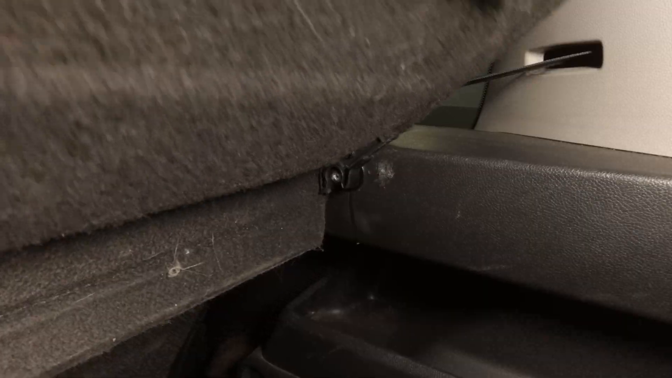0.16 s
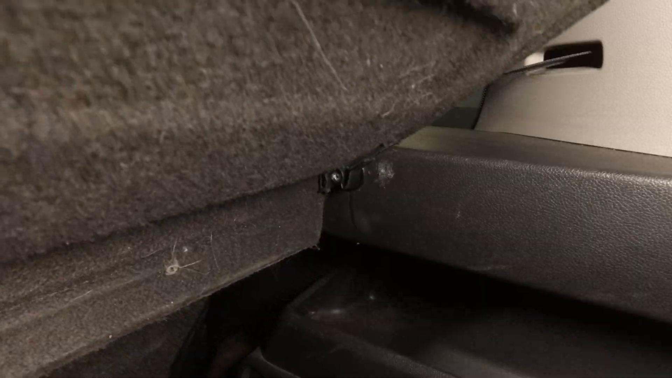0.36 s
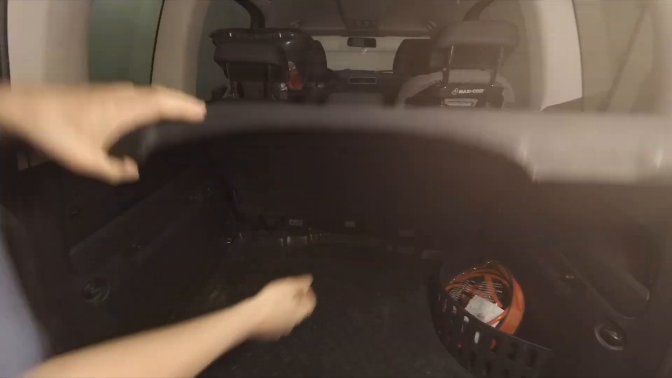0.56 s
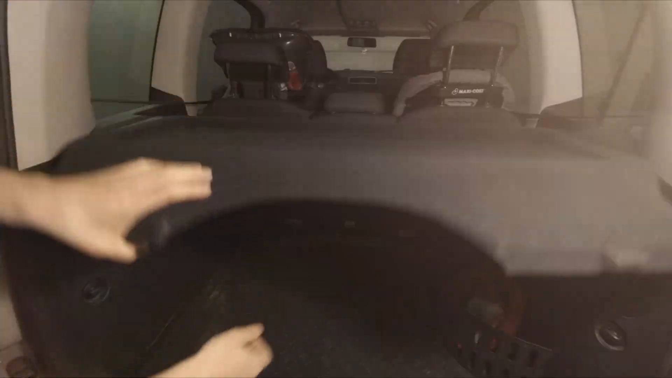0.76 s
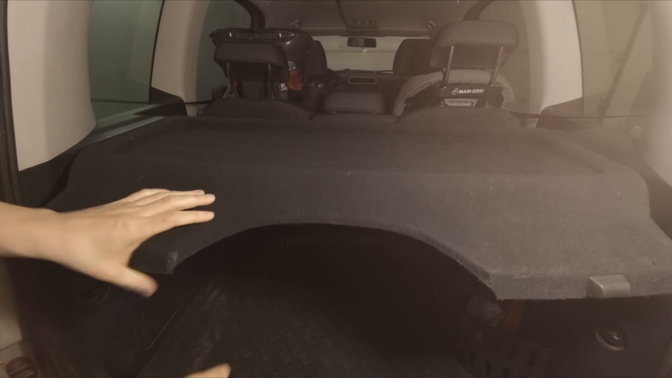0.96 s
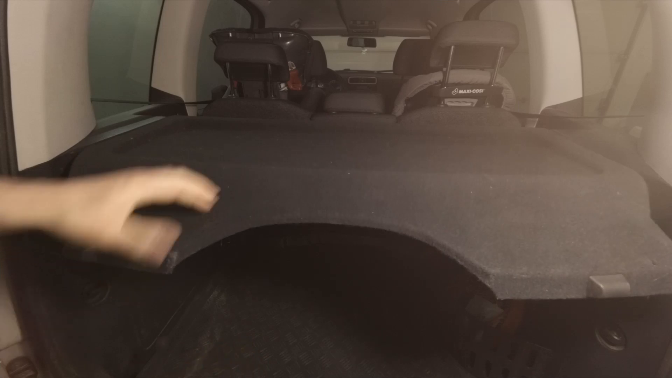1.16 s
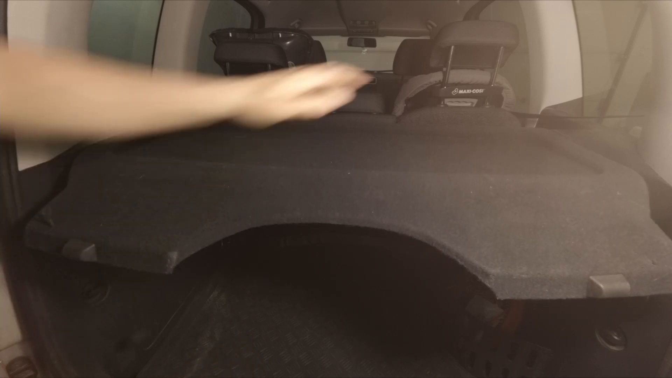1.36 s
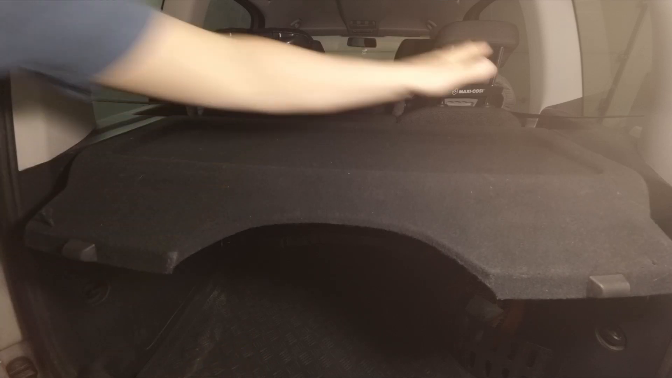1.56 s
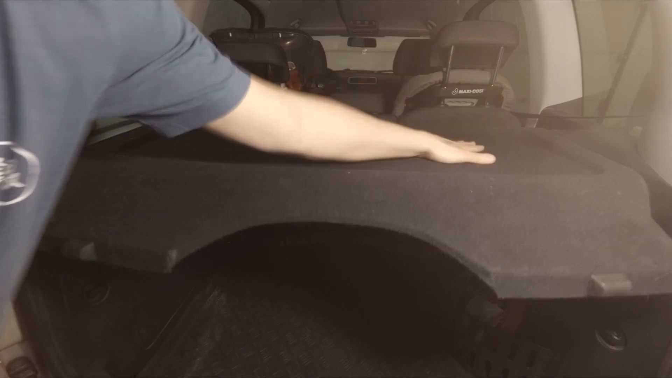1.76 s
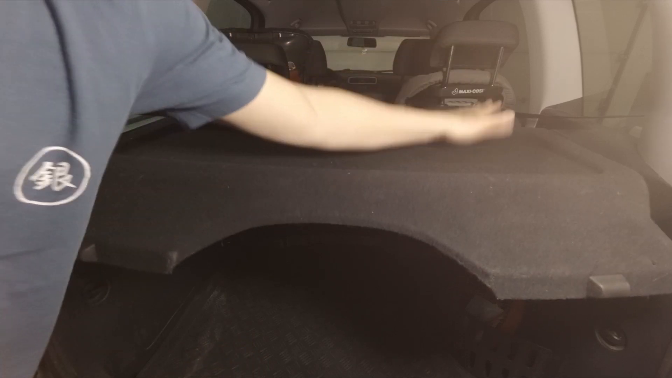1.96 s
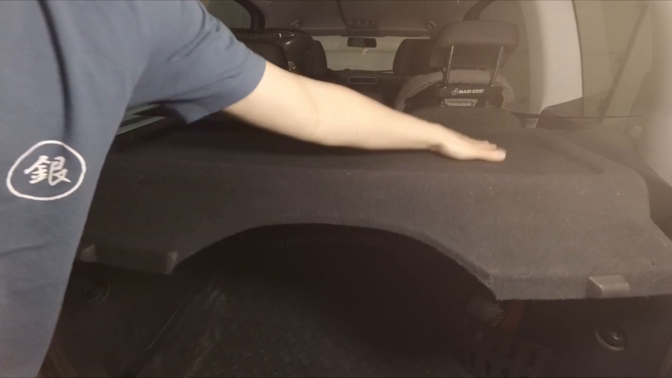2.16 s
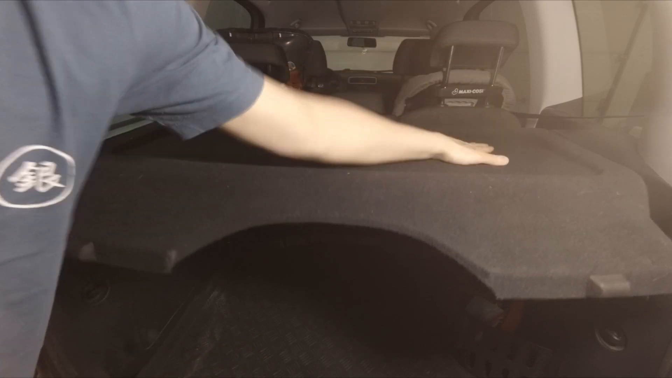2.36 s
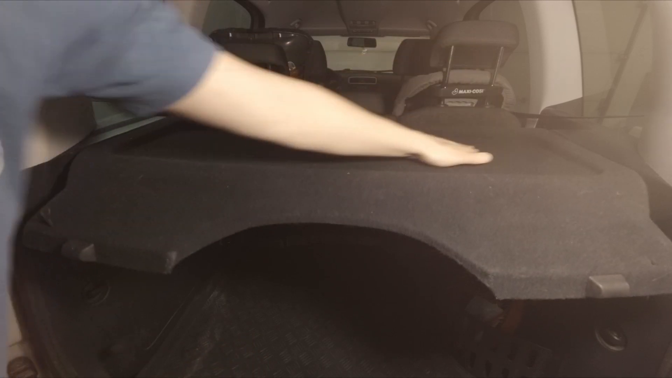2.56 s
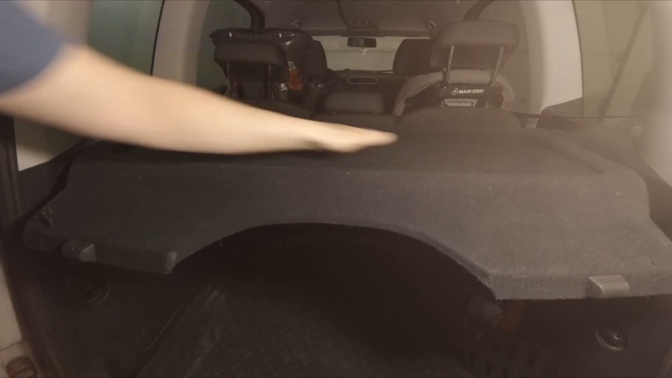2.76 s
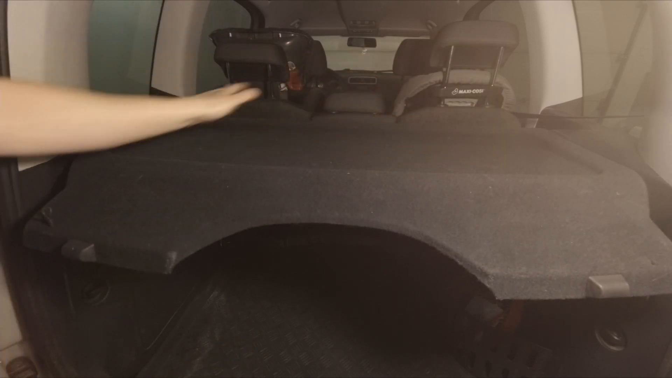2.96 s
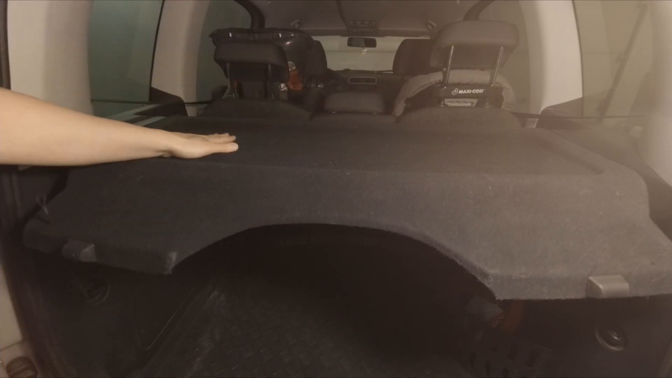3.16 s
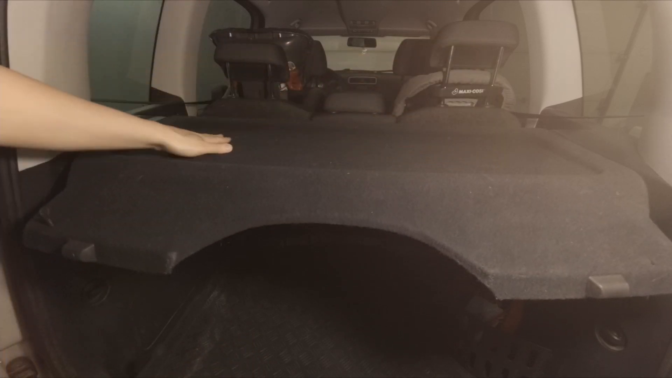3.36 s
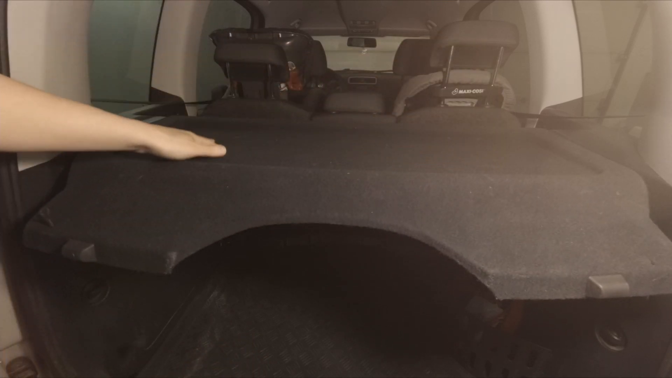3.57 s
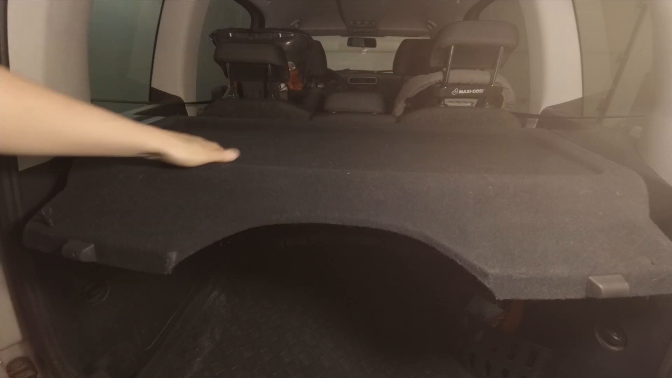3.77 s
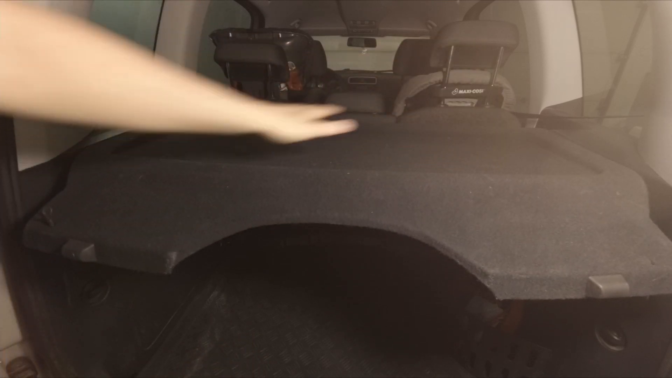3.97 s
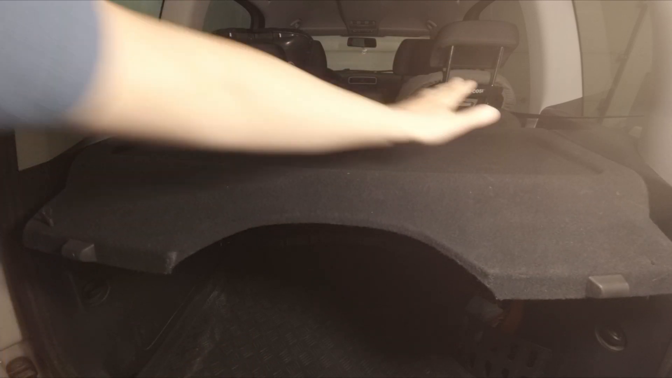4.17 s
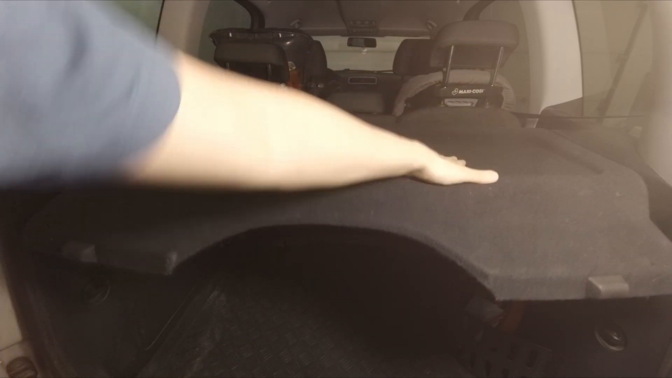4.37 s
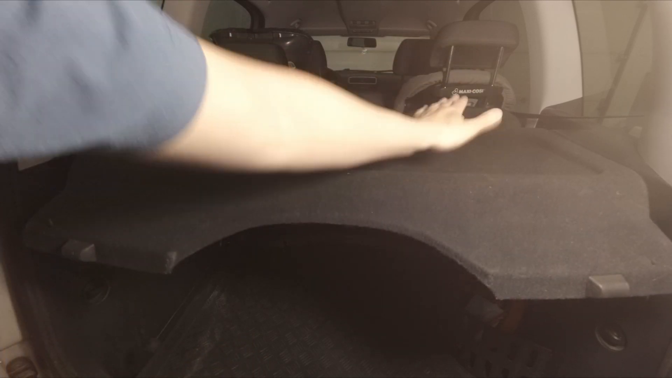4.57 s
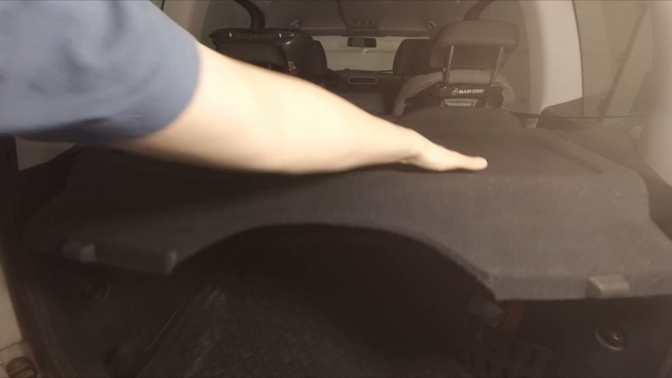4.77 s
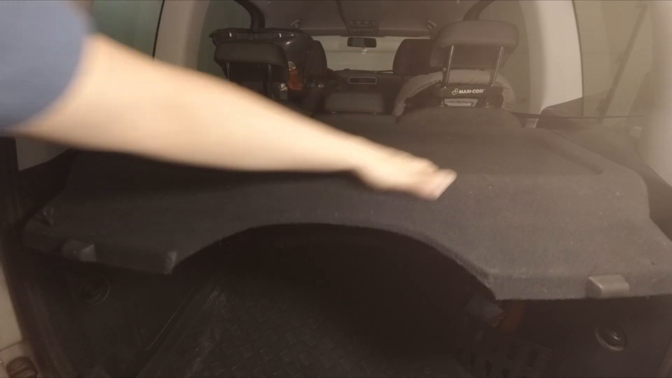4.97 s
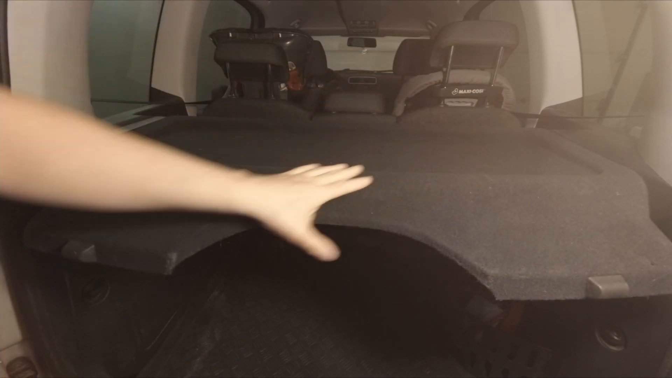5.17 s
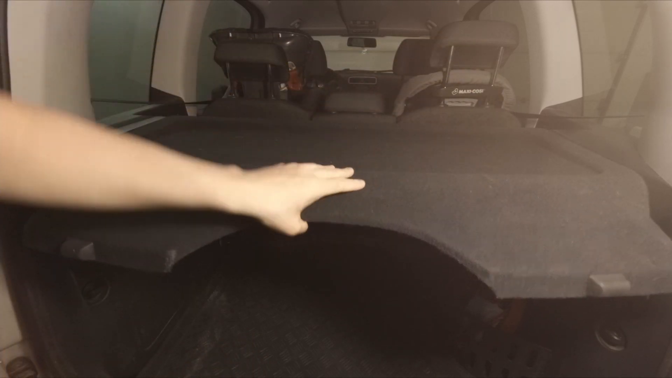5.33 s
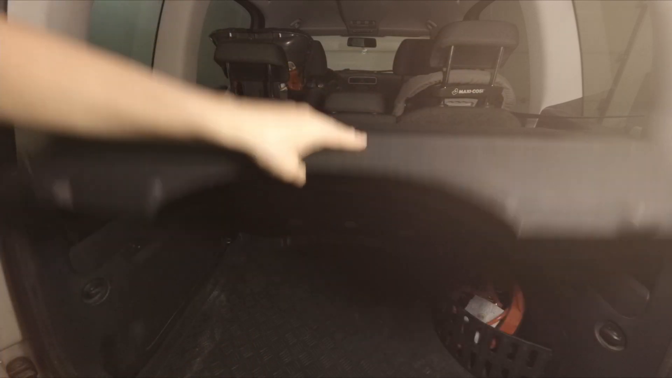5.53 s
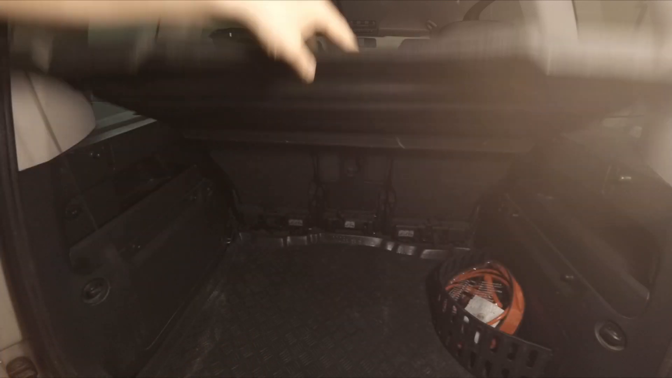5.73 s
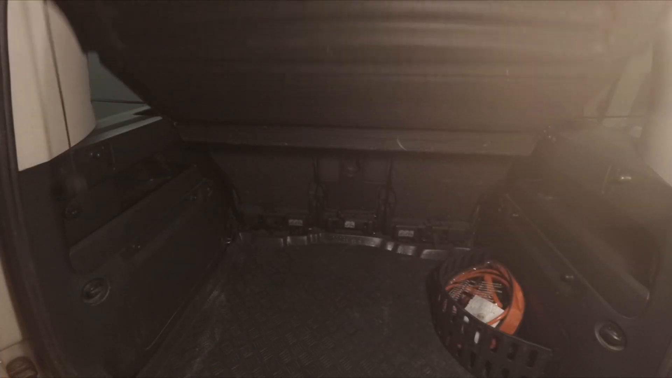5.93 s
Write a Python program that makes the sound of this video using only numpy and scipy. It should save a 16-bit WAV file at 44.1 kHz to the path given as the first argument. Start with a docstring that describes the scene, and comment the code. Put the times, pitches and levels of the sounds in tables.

```python
"""In a garage, a car's carpeted parcel shelf scrapes down the trunk trim and drops onto its side pins.
A flat hand slaps it six times: the board thuds, the pins rattle in their plastic seats, the trunk booms
and the garage echoes. The palm brushes over the carpet with a soft hiss, and the shelf bumps and
scrapes lightly as it is lifted. Under it all lie a faint rush of air and a thin electrical whine."""
import sys
import numpy as np
from scipy import signal
from scipy.fft import rfft, irfft, next_fast_len
from scipy.io import wavfile
from scipy.ndimage import map_coordinates

SR = 44100
rng = np.random.default_rng(int(sys.argv[2]) if len(sys.argv) > 2 else 0)


def file_out(sig):
    """Save sig as 16-bit WAV at sys.argv[1]."""
    # one column per channel
    cols = np.atleast_2d(sig).T
    # limit, then scale
    lim = np.clip(cols, -1, 1)
    pcm = np.round(lim * 32767).astype(np.int16)
    wavfile.write(sys.argv[1], SR, pcm)


N = 264588  # about 6 s

# Levels are relative: each sound adds its own gain. t60 is the time a ring takes to fade by 60 dB.
# Each slap of the hand: t/s, strength/dB, boom/dB, bend/dB, time until the palm stops the bend/s,
# lining/dB, smack/dB, smack tilt/(dB per octave), place along the board/(0-1), air pop/Hz, air pop/dB,
# pin click/dB, trim knock/dB, rebound knock/dB
SLAPS = [(1.838, -4, -13.5, -18, 0.5, -21.5, -15.5, -3, .38, 394, -1.5, -21.5, -10, -26),
         (2.13, -3.5, -14, -16.5, 0.25, -20.5, -14.5, 0, .58, 394, 2.5, -24, -17.5, -27),
         (2.4372, -4.5, -13, -17.5, 0.33, -16.5, -11.5, -4, .5, 552, -2, -23, -10, -17),
         (3.1701, -8, -26, -10.5, 0.23, -14.5, -18.5, -3.5, 0.4, 400, 3, -24, -11, -23),
         (4.399, -11, -15.5, -9.5, 0.35, -17.5, -14, -2.5, .47, 615, -2, -31, -23.5, -19.5),
         (4.7565, -8.5, -14, -10.5, 0.47, -14, -11, -0.5, 0.5, 1320, -4.5, -28, -12, -17)]
# Tone of the smack, the board's many high notes together: f/Hz, level/dB
SMACK_TONE = [(120, -21), (300, -1.5), (550, -1), (900, -4), (1400, -7), (2100, -13.5), (3200, -25),
              (6000, -35.5), (15000, -51.5)]
# How long the smack rings: f/Hz, t60/s
SMACK_FADE = [(200, 0.18), (1000, .1), (3000, 0.082), (12000, 0.03)]
# The board's own notes: f/Hz, level/dB, t60/s
BOARD_NOTES = [(151.4, -6, 0.19), (187, -8, 0.28), (213, -10, 0.17), (295.1, -8.5, 0.25),
               (324.6, -23, 0.33), (363, -4.5, 0.079), (450, -6.5, 0.088), (538, -3, 0.11),
               (705.7, -15.5, 0.07)]
# The board's slowest bending: f/Hz, level/dB
BEND_NOTES = [(102, -22.5), (116.5, -9)]
# The boom of the air in the trunk: f/Hz, level/dB, t60/s
TRUNK_NOTES = [(64.4, -21, 1), (70.6, -12.5, 0.55)]
# Hollow ring of the trunk lining: f/Hz, level/dB
LINING_TONE = [(55, -30), (85, -2.5), (130, 2.5), (180, 1.5), (225, 0), (260, -5), (320, -8.5),
               (500, -12.5), (1000, -49.5)]


def hand_slaps():
    """Each slap bends the board, smacks its surface and pumps the air above and under it."""
    out, t = np.zeros(N), np.arange(SR) / SR
    bend_notes = [(hz, level, 1) for hz, level in BEND_NOTES]  # left alone, they have a t60 of 1 s
    for s, db, boom_db, bend_db, free_s, lining_db, smack_db, tilt, place, pop_hz, pop_db, *_ in SLAPS:
        # a flatter palm sounds brighter
        smack_tone = [(hz, level + tilt * np.log2(hz / 700)) for hz, level in SMACK_TONE]
        smack = noise_burst(smack_tone, SMACK_FADE, size=8192)
        thud = ringing(BOARD_NOTES, place, place_db=2.5, attack_s=0.0016, detune=0.024)
        bend = ringing(bend_notes, place, place_db=3, attack_s=0.0065, detune=0.0047)
        palm_damping = 1 / (1 + (t / free_s) ** 8)
        boom = ringing(TRUNK_NOTES, place, place_db=-0.5, attack_s=0.0091, detune=0.0055)
        lining = noise_burst(LINING_TONE, fade=[(90, 0.53), (300, 0.4)], size=SR // 2)
        add(out, s, amp(db + pop_db) * air_pop(pop_hz, t60=0.022))
        add(out, s, amp(db + smack_db + 4.5) * smack)
        add(out, s, amp(db - 6) * thud)
        add(out, s, amp(db + bend_db + 6) * palm_damping * bend)
        add(out, s, amp(db + boom_db + 6) * boom)
        add(out, s, amp(db + lining_db) * lining)
    return out


def air_pop(hz, t60):
    """Air squeezed out from under the palm pops for a few cycles."""
    t = np.arange(SR // 10) / SR
    rise = 1 - np.exp(-4 * hz * t)
    return np.sin(2 * np.pi * hz * t) * amp(-60 * t / t60) * rise


# The pins first drop into their seats: t/s, click/dB, knock/dB
FIRST_LANDING = (0.97, -46, -26)
# The two pins hop and land in turn: flight after a 0 dB slap/s, extra click/dB, extra knock/dB
PIN_HOPS = [(0.0101, -2, -3), (.0175, -0.5, -0.5)]


def pin_landings():
    """List t/s, click/dB, knock/dB: a harder slap gives longer hops and a louder rebound click."""
    landings = [FIRST_LANDING]
    for s, db, *_, click_db, knock_db, rebound_db in SLAPS:
        for flight_s, extra_click, extra_knock in PIN_HOPS:
            landings.append((s + flight_s * amp(0.45 * db), click_db + extra_click, knock_db + extra_knock))
        landings.append((s + 0.059, click_db + 1.2 * db, rebound_db))  # the board swings back
    return landings


# A pin's sharp click: f/Hz, level/dB
CLICK_TONE = [(600, -27), (1500, 5), (2600, 6.5), (3600, -0.5), (4400, 0.5), (5600, -3), (8300, -2.5),
              (10000, -12), (12500, -16.5), (16000, -26.5)]
# How long the click rings: f/Hz, t60/s
CLICK_FADE = [(1000, 0.08), (5000, 0.067), (14000, 0.1)]
# The trim's hollow knock, also heard when the shelf bumps: f/Hz, level/dB
KNOCK_TONE = [(90, -26.5), (200, -1.5), (500, 2.5), (1000, 0.5), (2000, -12), (4000, -26.5), (12000, -50.5)]
# Notes of the plastic side panels: f/Hz, level/dB, t60/s
TRIM_NOTES = [(1102, 0.5, 0.28), (1170, -0.5, 0.32), (1453, -3.5, 0.2), (1600, -11, 0.16),
              (2036, -9.5, .18), (2275, -3, 0.16), (2614, -5.5, 0.21), (3180, -12.5, 0.16)]


def pin_rattle():
    """At each landing a pin chatters in its seat, knocks the trim and sets it ringing."""
    out = np.zeros(N)
    for s, click_db, knock_db in pin_landings():
        chatter = unit_rms(amp(3.5 * wobble(900, size=4096)))
        click = noise_burst(CLICK_TONE, CLICK_FADE)
        knock = noise_burst(KNOCK_TONE, fade=[(200, 0.033), (2000, 0.13)])
        ring = ringing(TRIM_NOTES, place=rng.random(), place_db=-2, attack_s=0.00091, detune=0.0035)
        add(out, s, amp(click_db - 6) * chatter * click)
        add(out, s, amp(knock_db - 7) * knock)
        add(out, s, amp(knock_db - 26) * ring)
    return out


# The shelf bumping on its supports: t/s, thud/dB, knock/dB, scuff/dB
SHELF_BUMPS = [(0.237, -70, -63, -59.5), (0.774, -57, -61, -49), (0.847, -50, -50.5, -54),
               (0.892, -44, -42, -55), (0.959, -21, -32, -50), (0.973, -17.5, -20, -20.5),
               (0.986, -14, -28, -42), (5.476, -59, -60, -57.5), (5.497, -46, -53, -46),
               (5.513, -41, -59, -57), (5.61, -57, -76, -68)]
# Notes of the whole shelf bouncing: f/Hz, level/dB, t60/s
BOUNCE_NOTES = [(66.9, -25, .5), (115, 1.5, 0.2), (127, 6, 0.076), (149.8, -1, 0.109), (212.5, -6, 0.11)]
# Felt pressed on the trim: f/Hz, level/dB
FELT_TONE = [(200, 16.5), (600, 7), (1100, -18), (2000, -9.5), (4000, -22), (9000, -24), (15000, -39.5)]


def shelf_bumps():
    """The shelf's weight meets its supports: a short, heavy thud, a hollow knock and a scuff of felt."""
    out = np.zeros(N)
    for s, thud_db, knock_db, scuff_db in SHELF_BUMPS:
        thud = ringing(BOUNCE_NOTES, place=0.5, place_db=1, attack_s=0.0015, detune=0.0035)
        knock = noise_burst(KNOCK_TONE, fade=[(200, 0.17), (2000, 0.024)], size=8192)
        scuff = noise_burst(FELT_TONE, fade=[(500, 0.21), (6000, 0.14)], size=8192)
        add(out, s, amp(thud_db) * thud)
        add(out, s, amp(knock_db) * knock + amp(scuff_db) * scuff)
    return out


# The edge dragging along the trim: start/s, end/s, rasp/dB, panel/dB, easing off/(dB per s)
EDGE_DRAGS = [(0.463, 0.726, -53.5, -47, 47), (0.736, 0.932, -58.5, -58, 8.5),
              (0.982, 1.201, -53.5, -42, 79), (5.561, 6, -77.5, -71.5, 3.5)]
# The shelf catching hard and snapping free: t/s, level/dB
HARD_SNAPS = [(.238, -55), (.2853, -45), (.3726, -52.5), (.4693, -40.5), (.4978, -32.5), (.614, -36),
              (.6769, -36), (.7452, -39), (.7542, -41), (.7766, -37), (.8041, -34), (.823, -31),
              (.849, -30), (.8879, -32), (.9333, -36), (1.0261, -24), (1.1997, -42), (2.9552, -55),
              (3.9115, -59), (5.7573, -48.5)]
# The rasp of the fibres: f/Hz, level/dB
RASP_TONE = [(1060, -33.5), (1800, -5.5), (2670, -4.5), (3410, -5), (6070, -10.5), (7840, -8.5),
             (12700, -16.5), (14900, -17), (16000, -23.5)]
# The scraped panel sounding along: f/Hz, level/dB
PANEL_TONE = [(88, -47.5), (150, -4.5), (288, -4), (377, -2.5), (456, -11), (578, -2), (1110, -8),
              (1160, -11.5), (1420, -6), (1660, -9.5), (2200, -14.5), (2860, -42), (4840, -120)]
# One snap, also used for the finger ticks: f/Hz, level/dB
SNAP_TONE = [(200, 11.5), (700, 1.5), (1300, -2.5), (2200, -2.5), (3500, 1.5), (6000, -2), (8000, -5.5),
             (11000, -17.5), (16000, -21.5)]


def edge_scrapes(slips_per_s=45, slip_over_rasp_db=10.5, scatter_db=3.5):
    """The shelf's edge drags over the trim: fibres rasp, catch and snap free, and the panel resounds."""
    rasp, panel, snaps = np.zeros(N), np.zeros(N), list(HARD_SNAPS)
    for start, end, rasp_db, panel_db, easing in EDGE_DRAGS:
        pressure = stroke(start, end, attack_s=0.017, slope_db_per_s=-easing, release_db_per_s=351)
        rasp += amp(rasp_db) * pressure
        panel += amp(panel_db) * pressure
        for s in np.arange(start, end, 1 / slips_per_s):
            slip_db = rasp_db - easing * (s - start) + slip_over_rasp_db
            slip_db += scatter_db * rng.standard_normal()
            snaps.append((s + rng.random() / slips_per_s, slip_db))
    grip = amp(3.5 * wobble(300))
    out = rasp * with_tone(grip * rng.standard_normal(N), RASP_TONE)
    out += amp(-4) * panel * with_tone(grip * rng.standard_normal(N), PANEL_TONE)
    for s, db in snaps:
        snap = amp(-4) * noise_burst(SNAP_TONE, fade=[(500, 0.016), (5000, 0.01)])
        trim_ring = amp(-15) * noise_burst(SNAP_TONE, fade=[(500, 0.06), (5000, 0.03)])
        add(out, s, amp(db) * (snap + trim_ring))
    return out


# Squeaks as the edge slides in: t/s, length/s, starting f/Hz, ending f/Hz, level/dB
PLASTIC_SQUEAKS = [(0.237, 0.0072, 404, 353, -43), (0.283, 0.024, 1130, 1130, -59),
                   (0.394, 0.027, 382, 340, -57.5), (0.491, 0.025, 343, 810, -41),
                   (0.502, 0.06, 1260, 1447, -44), (0.558, 0.042, 545, 576, -47),
                   (0.767, 0.024, 290, 256, -47.5), (0.886, 0.032, 438, 437, -45)]


def plastic_squeaks():
    """Plastic sticks and slips, making brief gliding tones with a ragged pitch."""
    out = np.zeros(N)
    for s, length_s, start_hz, end_hz, db in PLASTIC_SQUEAKS:
        progress = np.linspace(0, 1, int(length_s * SR))
        glide_hz = start_hz + (end_hz - start_hz) * progress
        hz = glide_hz * (1 + 0.126 * wobble(500, size=len(progress)))
        swell = np.sin(np.pi * progress)
        add(out, s, amp(db) * swell * np.sin(2 * np.pi * np.cumsum(hz) / SR))
    return out


# The palm sliding over the carpet: start/s, end/s, level at the end/dB
PALM_SLIDES = [(2.5, 2.64, -56), (3.34, 3.474, -68.5), (4.882, 5.343, -56)]
# The hiss of brushed carpet: f/Hz, level/dB
CARPET_TONE = [(530, -30), (900, -6), (1390, 0), (1470, -0.5), (1830, -2.5), (3430, -4.5), (5280, -12),
               (5680, -9.5), (8660, -8), (13000, -12), (14900, -12), (16000, -24.5)]


def palm_slides(swell_db_per_s=8):
    """Skin brushing over carpet makes a fine hiss that swells as the hand gathers speed."""
    gain = np.zeros(N)
    for start, end, end_db in PALM_SLIDES:
        start_db = end_db - swell_db_per_s * (end - start)
        slide = stroke(start, end, attack_s=0.07, slope_db_per_s=swell_db_per_s, release_db_per_s=227)
        gain += amp(start_db) * slide
    flutter = amp(1.6 * wobble(40))
    return gain * flutter * with_tone(rng.standard_normal(N), CARPET_TONE)


def finger_ticks(per_s=14, loudest_db=-58, range_db=9):
    """Fingers and a sleeve shift on the shelf all the while, making faint, scattered ticks."""
    out = np.zeros(N)
    for when, softness in rng.random((int(per_s * N / SR), 2)):
        tick = noise_burst(SNAP_TONE, fade=[(500, 0.044), (5000, 0.04)])
        add(out, when * N / SR, amp(loudest_db - range_db * softness) * tick)
    return out


# How long the garage echoes: f/Hz, t60/s
ECHO_FADE = [(60, 0.83), (250, 0.46), (600, 0.85), (1500, 0.9), (4500, 0.96), (8000, 0.55), (14000, 0.088)]
# Tone of the echo: f/Hz, level/dB
ECHO_TONE = [(30, -31.5), (90, -6.5), (170, -5), (300, -1.5), (700, -1.5), (1500, -0.5), (4500, 1.5),
             (8000, -1), (15000, -7)]


def garage_echo(sound, frame=512):
    """A smooth echo: energy at each pitch builds up, lingers as noise and falls faster at its end."""
    hz, t, spectrum = signal.stft(sound, SR, nperseg=frame)
    t = t[t < 1]
    swell = (1 - np.exp(-(t / 0.0076) ** 2)) / (1 + (t / 0.36) ** 8)
    tail = (swell * amp(-60 * t / value_at(ECHO_FADE, hz)[:, None])) ** 2
    tail *= amp(value_at(ECHO_TONE, hz))[:, None] ** 2 / tail.sum(1, keepdims=True)
    energy = np.abs(signal.fftconvolve(np.abs(spectrum) ** 2, tail, axes=1))[:, :spectrum.shape[1]]
    noise = signal.stft(rng.standard_normal(N), nperseg=frame)[2]
    return signal.istft(np.sqrt(energy) * noise / noise.std(), nperseg=frame)[1][:N]


# The still air of the garage: f/Hz, level/dB
AIR_TONE = [(25, -12), (62, -2), (120, 0), (250, -2), (500, -1), (1000, -6), (1600, -8), (2500, -14),
            (5000, -14), (12000, -20), (16000, -29)]


def garage_air():
    """The faint, steady rush of the room and a thin electrical whine."""
    whine = amp(-86) * np.sin(2 * np.pi * 15300 * np.arange(N) / SR)
    return amp(-72) * with_tone(rng.standard_normal(N), AIR_TONE) + whine


def ringing(notes, place, place_db, attack_s, detune):
    """A struck object's fading notes: the place of the hit favours some, and each is a little off tune."""
    t = np.arange(SR) / SR
    hz, db, t60 = np.transpose(notes)[:, :, None]
    k = np.arange(len(notes))[:, None]
    level = db + place_db * np.cos(np.pi * (k + 1) * place) + rng.standard_normal(hz.shape)
    hz = hz * (1 + detune * rng.standard_normal(hz.shape))
    waves = (-1) ** k * amp(level - 60 * t / t60) * np.sin(2 * np.pi * hz * t)
    return waves.sum(0) * (1 - np.exp(-t / attack_s))


def noise_burst(tone, fade, size=4096):
    """Countless notes struck at once blur into noise; fade lists f/Hz, t60/s for how it dies away."""
    hz, t = np.fft.rfftfreq(size, 1 / SR), np.arange(size) / SR
    centres = np.geomspace(80, 14000, 8)  # eight bands of pitch
    shares = np.array([value_at(np.c_[centres, row], hz) for row in np.eye(8)])
    phases = np.exp(2j * np.pi * rng.random(len(hz)))
    bands = irfft(phases * amp(value_at(tone, hz)) * shares, size)
    rises = 1 - np.exp(-(2 * centres[:, None] * t) ** 2)  # half a cycle to get going
    gains = rises * amp(-60 * t / value_at(fade, centres)[:, None])
    sound = (bands * gains).sum(0)
    power = bands.var(1) / bands.var(1).sum()
    return sound * np.sqrt(power @ (gains ** 2).sum(1)) / np.linalg.norm(sound)  # starts near rms 1


def stroke(start, end, attack_s, slope_db_per_s, release_db_per_s):
    """Loudness of one rub: it rises, grows or eases while it lasts, then dies away."""
    t = np.arange(N) / SR
    rise = np.clip((t - start) / attack_s, 0, 1)
    rubbed_s, after_s = np.clip(t, start, end) - start, np.maximum(t - end, 0)
    return rise * amp(slope_db_per_s * rubbed_s - release_db_per_s * after_s)


def with_tone(sound, tone):
    """Filter a sound by an f/Hz, level/dB table and scale it to rms 1."""
    size = next_fast_len(len(sound) + 8192)
    gain = amp(value_at(tone, np.fft.rfftfreq(size, 1 / SR)))
    return unit_rms(irfft(rfft(sound, size) * gain, size)[:len(sound)])


def wobble(per_s, size=N):
    """A wandering line through per_s random points a second."""
    points = rng.standard_normal(int(size * per_s / SR) + 4)
    return map_coordinates(points, [np.arange(size) * per_s / SR], order=1)


def value_at(table, hz):
    """Read between the rows of an f/Hz, value table on a log (pitch-like) scale."""
    f, values = np.transpose(table)
    return np.interp(np.log(hz + 1), np.log(f + 1), values)


def amp(db):
    """Turn decibels into a gain."""
    return 10 ** (np.asarray(db) / 20)


def unit_rms(sound):
    """Scale a sound so that its average size (rms) is 1."""
    return sound / np.sqrt(np.mean(sound ** 2) + 1e-20)


def add(track, s, sound):
    """Mix a sound into the track, starting at s seconds."""
    part = track[max(round(s * SR), 0):][:len(sound)]
    part += sound[:len(part)]


def scene():
    """Slaps on top of the shelf fill the garage; bumps and scrapes down in the trunk echo less."""
    knocks = hand_slaps() + pin_rattle()
    handling = edge_scrapes() + plastic_squeaks() + shelf_bumps() + finger_ticks()
    echo = garage_echo(amp(-6.5) * knocks + amp(-14) * handling)
    return (knocks + handling + palm_slides() + echo + garage_air())[None]


# The microphone's tone: f/Hz, level/dB
MIC_TONE = [(20, -10), (45, -3), (60, 0.5), (12500, 2.5), (14000, -3), (15500, -9), (16000, -13.5)]


def record(dry):
    """Round off the loudest peaks, thin the deepest bass and top treble, and cut all above top_hz."""
    top_hz = 15950
    rounded = dry / (1 + dry ** 6) ** (1 / 6)
    size = next_fast_len(N + SR // 2)
    hz = np.fft.rfftfreq(size, 1 / SR)
    gain = amp(value_at(MIC_TONE, hz)) * (hz < top_hz)
    return irfft(rfft(rounded, size) * gain, size)[:, :N]


dry = scene()
out = record(dry)
file_out(out)
```